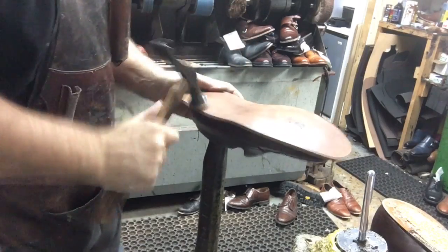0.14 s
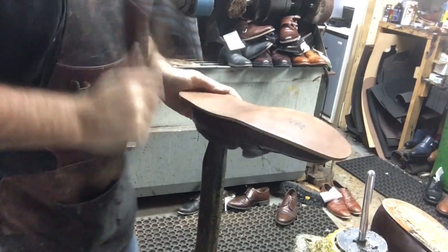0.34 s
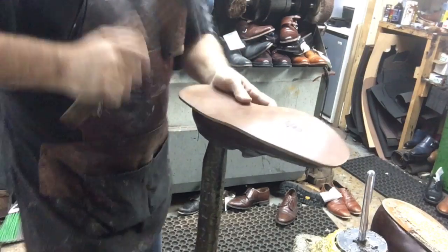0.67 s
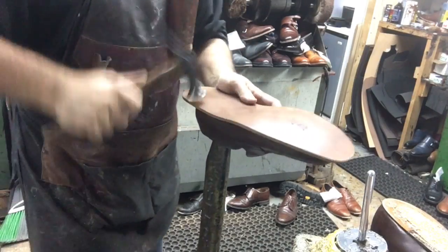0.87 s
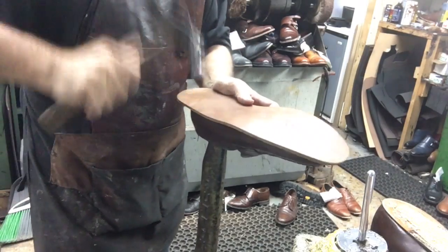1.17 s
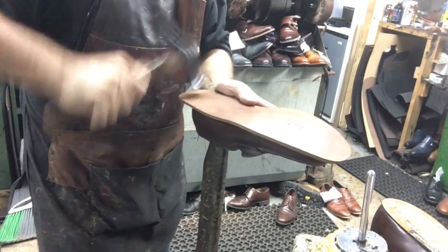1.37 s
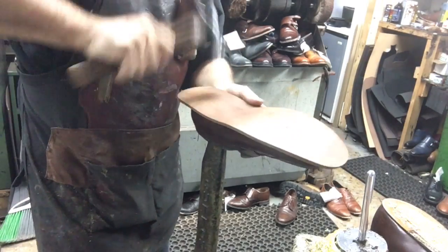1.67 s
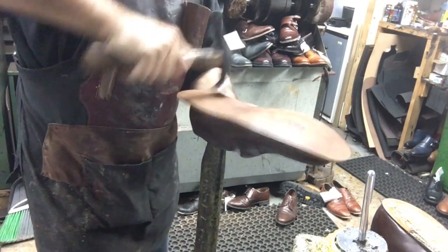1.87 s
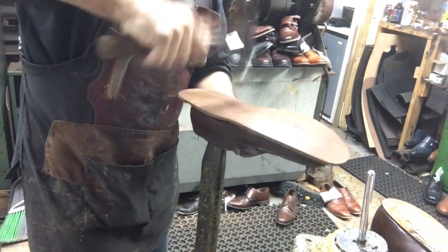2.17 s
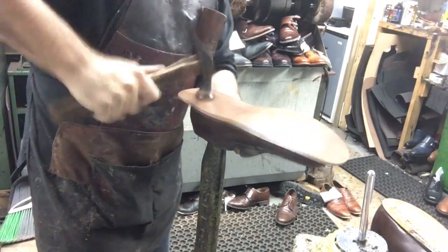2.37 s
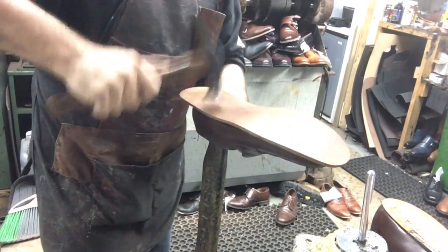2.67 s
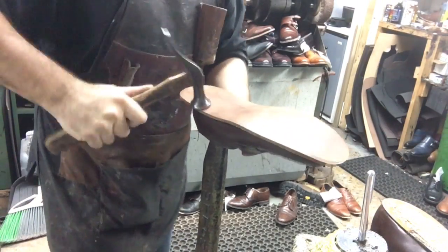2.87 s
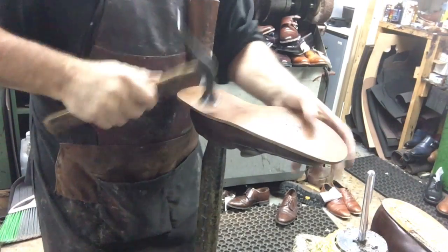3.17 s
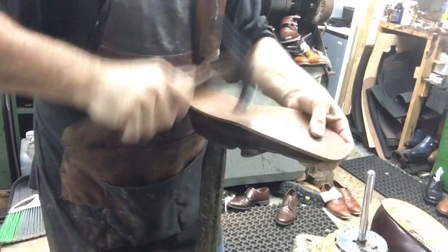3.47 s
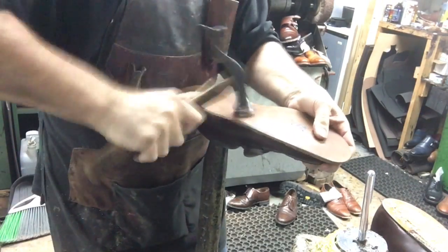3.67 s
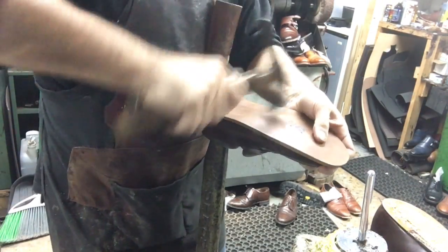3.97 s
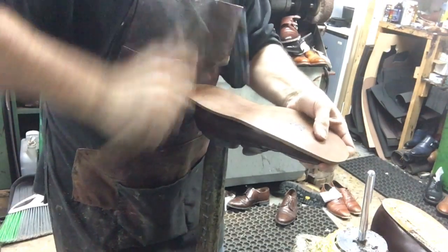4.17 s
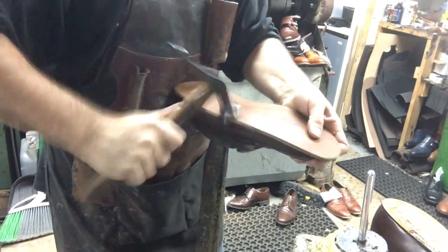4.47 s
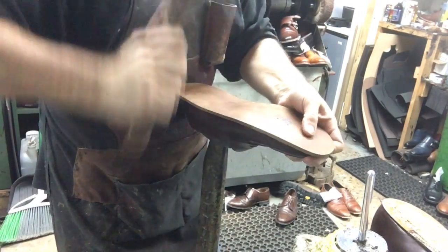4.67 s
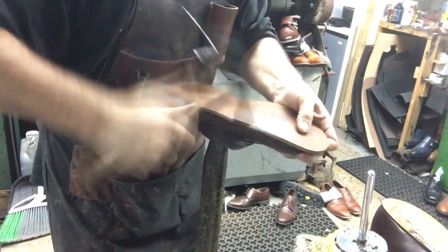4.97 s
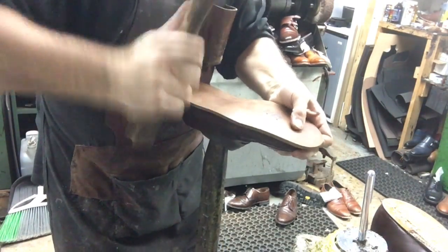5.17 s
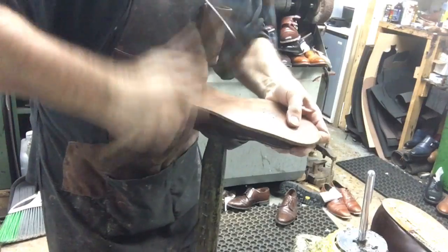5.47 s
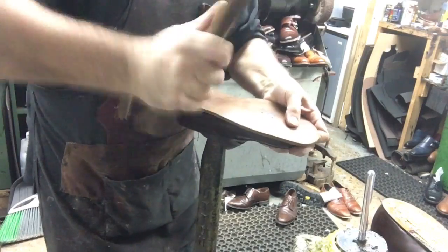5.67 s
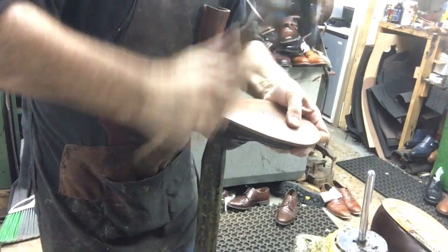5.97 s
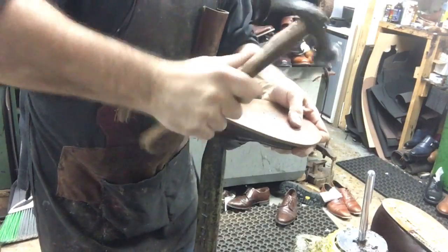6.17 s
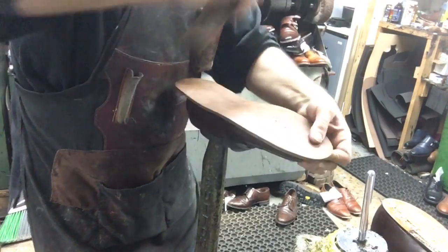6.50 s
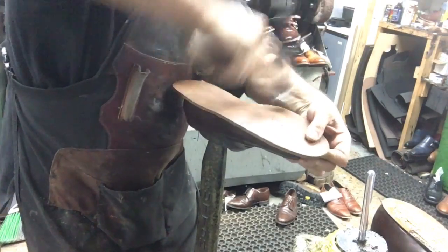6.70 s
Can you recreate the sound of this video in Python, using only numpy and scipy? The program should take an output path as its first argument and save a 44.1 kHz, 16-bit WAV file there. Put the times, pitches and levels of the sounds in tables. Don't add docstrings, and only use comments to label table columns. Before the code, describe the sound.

Rapid, even hammer blows slap leather over iron, each with a sharp crack, brief metallic ring and low floor thump, close up in a small shop.

```python
import sys
import numpy as np
from scipy import signal
from scipy.io import wavfile
from scipy.ndimage import uniform_filter1d

SR = 44100
rng = np.random.default_rng(int(sys.argv[2]) if len(sys.argv) > 2 else 0)


def pcm_store(signal):
    levels = np.round(np.clip(np.atleast_2d(signal), -1, 1) * 32767)
    wavfile.write(sys.argv[1], SR, levels.astype(np.int16).T)


def boost_factor(decibels):
    exponent = np.asarray(decibels, float) / 20
    return 10 ** exponent


N = 301581
LEAD = 4410

CENTRES = 30 * 2 ** np.arange(0, 9.2, 1 / 3)
USUAL_CRACK_DB = -8
HEEL_FROM_S = 3.2


def at_hz(table, hz):
    rows = np.array(table)
    return [np.interp(np.log(hz), np.log(rows[:, 0]), column) for column in rows.T[1:]]


def band_pass(x, low_hz, high_hz, order=2):
    return signal.sosfilt(signal.butter(order, [low_hz, high_hz], "band", fs=SR, output="sos"), x)


def band(x, hz):
    return band_pass(x, hz / 1.12, hz * 1.12)


def ring(hits, hz, t60_s):
    r = boost_factor(-60 / (t60_s * SR))
    w = 2 * np.pi * hz / SR
    return signal.lfilter([0, np.sin(w)], [1, -2 * r * np.cos(w), r * r], hits + 1e-18)


def clicks(seconds, gains):
    out = np.zeros(N + LEAD)
    at = np.round(np.asarray(seconds) * SR).astype(int) + LEAD
    inside = at < len(out)
    np.add.at(out, at[inside], np.asarray(gains)[inside])
    return out


def swell(hits, rise_s, t60_s):
    up, down = np.exp(-1 / (max(rise_s, 1e-5) * SR)), boost_factor(-60 / (t60_s * SR))
    dying = signal.lfilter([1], [1, -down], hits + 1e-18)
    return signal.lfilter([1 - up], [1, -up], dying)


COLOUR_HZ = [
    500,
    1100,
    2000,
    3800,
    10000,
]
# start_s [s], extra_edge_db [dB]
GLANCING = [
    (2.14, 9),
    (6.71, 11),
]
CRACK_BAND_DB = -8
SLAP_DB, SLAP_FOLLOWS = -18, 0.32
EDGE_DB, EDGE_FOLLOWS, EDGE_RINGS = -30.5, 0.058, 0.23


def blow_db(blows, hz):
    start_s, crack_db, body_db, knock_db, freedom_db = blows.T
    swing_db = crack_db - USUAL_CRACK_DB
    bite_db = sum(db * (abs(start_s - s) < .1) for s, db in GLANCING)
    colours = [crack_db + body_db,
               crack_db + knock_db,
               SLAP_DB + SLAP_FOLLOWS * swing_db,
               crack_db + CRACK_BAND_DB,
               EDGE_DB + EDGE_FOLLOWS * swing_db + EDGE_RINGS * freedom_db + bite_db]
    return np.array([np.interp(np.log(hz), np.log(COLOUR_HZ), row) for row in np.transpose(colours)])


# pitch_hz [Hz], density_db [dB per Hz]
HUM = [(30, -14), (55, -3), (80, -3.5), (105, 0), (135, -1), (190, -19), (300, -13), (1000, -20),
       (2500, -26.5), (5000, -31), (8000, -38), (16000, -42.5)]
HUM_DB = -61.5


def hum():
    white = rng.standard_normal((2, N + LEAD))
    noise = sum(boost_factor(at_hz(HUM, hz)[0]) * band(white[k % 2], hz) for k, hz in enumerate(CENTRES))
    return boost_factor(HUM_DB) * noise / np.std(noise)


# start_s [s], length_s [s], level_db [dB], centre_hz [Hz]
RUSTLES = [
    (.45, 0.15, -80, 11000),
    (0.636, .25, -78, 3500),
    (2.992, .5, -83, 3950),
    (6.446, 0.41, -87, 3900),
]
RUSTLE_RISE_S, RUSTLE_FALL_S, RUSTLE_REST_DB = 0.04, 0.08, -87.5


def rustle():
    t, out = (np.arange(N + LEAD) - LEAD) / SR, 0
    white = rng.standard_normal((2, N + LEAD))
    shapes = []
    for start_s, length_s, *_ in RUSTLES:
        corners_s = np.cumsum([0, RUSTLE_RISE_S, max(length_s - RUSTLE_RISE_S, 0), RUSTLE_FALL_S])
        shapes.append(np.interp(t - start_s, corners_s, [0, 1, 1, 0]))
    level_db, centre_hz = np.transpose(RUSTLES)[2:]
    for k, hz in enumerate(CENTRES[15:]):
        rest = boost_factor(RUSTLE_REST_DB - 6.5 * np.log2(hz / 4000) ** 2)
        moving = boost_factor(level_db - 7.6 * np.log2(hz / centre_hz) ** 2) @ np.array(shapes)
        out = out + (rest + moving) * band(white[k % 2], hz) * np.sqrt(SR / hz)
    return out


# pitch_hz [Hz], t60_s [s], slap_share_db [dB]
ROOM = [
    (200, 0.23, -3),
    (714, 0.17, -6.5),
    (2010, 0.15, -2),
    (5100, 0.13, -7.5),
    (8850, 0.16, -1),
    (13700, 0.016, -12.5),
]


def shop_echo(x, blows, count):
    t = np.arange(SR // 3) / SR
    white = rng.standard_normal((2, count, len(t)))
    tails = sum(band(white[k % 2], hz) * boost_factor(-60 * t / at_hz(ROOM, hz)[0])
                for k, hz in enumerate(CENTRES[7:]))
    tails *= 1 - np.exp(-t / 0.017)
    path = np.searchsorted(blows[:, 0] * SR + LEAD, np.arange(len(x))) % count
    out = 0
    for k, tail in enumerate(tails):
        even_tail = tail / np.sqrt(np.sum(tail ** 2))
        out = out + signal.fftconvolve(x * (path == k), even_tail)[:len(x)]
    return out


def rumble(blows):
    low = band_pass(rng.standard_normal(N + LEAD), 45, 135, order=4)
    shaken = swell(clicks(blows[:, 0], np.ones(len(blows))), rise_s=.03, t60_s=1.2)
    return boost_factor(HUM_DB + 13) * shaken * low / np.std(low)


# centre_hz [Hz], width_hz [Hz], level_db [dB]
FORERUNS = [
    (650, 130, -8.5),
    (1060, 380, 2.5),
    (3000, 84, 3.5),
    (4700, 770, -5.5),
    (5960, 460, -12),
    (8200, 65, -26),
]
FORERUN_LOW_DB, FORERUN_HIGH_DB, FORERUN_FOLLOWS, FORERUN_RINGS = -34, -44, 1.0, 0.79
FORERUN_LEAD_S, FORERUN_BROAD_DB, FORERUN_BROAD_S = .021, -21, .023


def foreruns(blows):
    out = np.zeros(N + LEAD)
    low = FORERUN_LOW_DB + FORERUN_FOLLOWS * (blow_db(blows, 1100) + 18) + FORERUN_RINGS * blows[:, 4]
    high = FORERUN_HIGH_DB + FORERUN_FOLLOWS * (blow_db(blows, 3000) + 16) + FORERUN_RINGS * blows[:, 4]
    t = np.arange(-2000, 0) / SR
    shape = np.clip(1 + t / FORERUN_LEAD_S, 0, 1) ** 3.0
    for start_s, low_db, high_db in zip(blows[:, 0], low, high):
        white = rng.standard_normal(2000)
        end = round(start_s * SR) + LEAD
        broad = band_pass(white, 700, 5000)
        out[end - 2000:end] += boost_factor(high_db + FORERUN_BROAD_DB) * (t > -FORERUN_BROAD_S) * broad / np.std(broad)
        for hz, width_hz, db in FORERUNS:
            narrow = band_pass(white, hz - width_hz / 2, hz + width_hz / 2)
            gain = boost_factor(db - 4 + (low_db if hz < 2000 else high_db))
            out[end - 2000:end] += gain * shape * narrow / np.std(narrow)
    return out


# start_s [s], peak_db [dB], centre_hz [Hz]
TOUCHES = [(0.663, -53, 3000), (0.674, -61, 4000), (2.364, -55.5, 915), (2.394, -40, 1490),
           (3.051, -42.5, 2420), (3.194, -56.5, 3000), (3.702, -49.5, 1810), (3.949, -48.5, 1840),
           (4.25, -56.5, 2500), (5.55, -63, 3000), (6.5753, -50, 3000), (6.688, -61, 4070)]


def touches():
    out, t = np.zeros(N + LEAD), np.arange(600) / SR
    for start_s, peak_db, hz in TOUCHES:
        tick = band_pass(rng.standard_normal(600), hz / 2, hz * 2)
        at = round(start_s * SR) + LEAD
        out[at:at + 600] += boost_factor(peak_db + 4.0) * tick * np.exp(-t / 0.0036)
    return out


# pitch_hz [Hz], t60_s [s], blow_share [gain], rock_share [gain]
BOARDS = [
    (58.2, .41, -1.48, .95),
    (65.7, .7, 1.7, -1.2),
    (84, .07, 1.45, 4.45),
    (100, .05, -1.77, -6.43),
    (108.7, .8, .15, .12),
    (151.5, .04, -.71, .55),
]
PUSHES = [
    .0022,
    .033,
]
TOE_WEIGHT_DB, HEEL_WEIGHT_DB, WEIGHT_FOLLOWS = -32.5, -29, 0.11


def floor_thump(blows):
    weight_db = np.where(blows[:, 0] < HEEL_FROM_S, TOE_WEIGHT_DB, HEEL_WEIGHT_DB)
    weight_db = weight_db + WEIGHT_FOLLOWS * (blows[:, 1] - USUAL_CRACK_DB)
    uneven_db = 1.2 * rng.standard_normal((len(blows), len(PUSHES)))
    blow, back = [clicks(blows[:, 0] + later_s, boost_factor(weight_db + uneven_db[:, k]))
                  for k, later_s in enumerate(PUSHES)]
    boards = sum(ring(first * blow + second * back, hz, t60_s) for hz, t60_s, first, second in BOARDS)
    return signal.sosfiltfilt(signal.butter(4, 190, fs=SR, output="sos"), boards)


IRON_HZ = [355, 600, 650, 990, 1165, 1212, 2090, 2125, 2175, 3100, 3150, 3200, 3765, 3980, 5450, 5630, 6190]
# level_db [dB], t60_s [s]
IRON = [(-28, .13), (-29, .09), (-30, .1), (-28, .1), (-27, .13), (-25, .12), (-35, .13), (-43, .22),
        (-34, .11), (-32, .12), (-31, .14), (-34, .19), (-35, .11), (-36, .1), (-41, .13), (-49, .2),
        (-44, .11)]
# pitch_hz [Hz], toe_db [dB], heel_db [dB]
RING_COLOUR = [(355, -8.5, -10), (620, -6.5, -6.5), (1110, -10, -3), (2210, -7.5, -4), (2980, -16, -10.5),
               (5500, -15, -4)]


def iron(blows, level_db, spread_db, flutter_db):
    chance = rng.standard_normal((len(blows), len(IRON)))
    out, t = 0, np.arange(N + LEAD)
    for k, (hz, (db, t60_s)) in enumerate(zip(IRON_HZ, IRON)):
        toe_db, heel_db = at_hz(RING_COLOUR, hz)
        struck_db = np.where(blows[:, 0] < HEEL_FROM_S, toe_db, heel_db) + blows[:, 4]
        hits = clicks(blows[:, 0] + .002, boost_factor(level_db + db + struck_db + spread_db * chance[:, k]))
        knots = len(t) // 300 + 2
        waver = np.interp(t / 300, np.arange(knots), rng.standard_normal(knots))
        out = out + ring(hits, hz, min(t60_s, .24)) * boost_factor(flutter_db * waver)
    return out


# pitch_hz [Hz], width_hz [Hz], added_db [dB]
BODY = [(1185, 110, 0), (2150, 160, 0), (3230, 170, 1), (4300, 220, -2), (5500, 220, 0), (6300, 240, 0),
        (7250, 240, 2), (8700, 260, 0)]


def body(x):
    out = x
    for hz, width_hz, db in BODY:
        r = np.exp(-np.pi * width_hz / SR)
        poles = [1, -2 * r * np.cos(2 * np.pi * hz / SR), r * r]
        out = out + boost_factor(db) * signal.lfilter([(1 - r * r) / 2, 0, (r * r - 1) / 2], poles, x)
    return out


# pitch_hz [Hz], level_db [dB], rise_s [s], t60_s [s]
SLAP = [(177.1, -16, 0.0087, 0.11), (248, -23, 0.0018, 0.06), (341, -3.5, 0.0062, 0.14),
        (470, -9.5, 0.0018, 0.12), (616, 11, 0.0026, 0.029), (714, -0.5, 0.0081, 0.059),
        (1112, -1, 0.00029, 0.091), (2260, 2, 0.00053, 0.032), (3012, 0, 0.0077, 0.026),
        (3660, 1, 0.0023, 0.029), (6410, 0.5, 0.00014, 0.019), (8000, -12, 0.00012, 0.0067),
        (11900, -10, 0.00014, 0.005), (16000, -16, .0002, .012)]
TAIL_RINGS = .4


def slap(blows, level_db, spread_db, grain_db, tail_db):
    grain = boost_factor(grain_db * rng.standard_normal((N + LEAD) // 30 + 1)).repeat(30)[:N + LEAD]
    grain /= np.sqrt(np.mean(grain ** 2))
    white = rng.standard_normal((4, N + LEAD))
    chance = rng.standard_normal((len(blows), len(CENTRES)))
    out = 0
    for k, hz in enumerate(CENTRES[8:]):
        db, rise_s, t60_s = at_hz(SLAP, hz)
        struck = boost_factor(level_db + db + blow_db(blows, hz) + spread_db * chance[:, k])
        burst = swell(clicks(blows[:, 0], struck), rise_s, t60_s) * band(white[k % 2] * grain, hz)
        room_t60_s, room_db = at_hz(ROOM, hz)
        sent = clicks(blows[:, 0], struck * boost_factor(TAIL_RINGS * blows[:, 4]))
        tail = boost_factor(tail_db + room_db) * swell(sent, 0.0083, room_t60_s) * band(white[2 + k % 2], hz)
        out = out + (burst + tail) * np.sqrt(SR / hz)
    return out


# later_s [s], level_db [dB]
BOUNCES = [
    (0, 0),
    (.0016, -2),
    (.0038, -2),
    (.008, -7),
]


def crack(blows, level_db, low_hz, high_hz):
    out, chance = 0, rng.uniform(-1, 1, (len(blows), len(BOUNCES), 2))
    for k, (later_s, db) in enumerate(BOUNCES):
        when = blows[:, 0] + later_s * (1 + 0.5 * chance[:, k, 0])
        tick_db = level_db + db + 3.0 * chance[:, k, 1] + blow_db(blows, 6900)
        out = out + clicks(when, (-1) ** (k + 1) * boost_factor(tick_db))
    return band_pass(out, low_hz, high_hz)


# start_s [s], crack_db [dB], body_db [dB], knock_db [dB], freedom_db [dB]
BLOWS = [(0.204, -15.5, -9.5, 0.5, -1), (0.4517, -12.5, -5, -9, -10.5), (0.8822, -5.5, -11.5, -12, -0.5),
         (1.1325, -6, -11.5, -10.5, -2), (1.385, -8.5, -6, -10, -6.5), (1.6275, -10.5, -9, -10, 0),
         (1.8752, -16, -5.5, -8, -4.5), (2.1397, -15, -5, -5, -17), (2.4204, -7, -18.5, -3, 3),
         (2.666, -7, -12.5, -3.5, 1.5), (2.908, -7, -7.5, -8, -2.5), (3.4595, -7.5, -12.5, -11.5, -1),
         (3.724, -4, -19.5, -11, 1.5), (3.9708, -8, -11, -8, -2.5), (4.271, -5, -22.5, -12.5, 0),
         (4.5305, -9, -12.5, -12.5, -2), (4.7973, -8, -16.5, -10, 0), (5.0532, -6.5, -15.5, -10, -6),
         (5.3111, -4.5, -19, -14, -3), (5.575, -2.5, -14.5, -15.5, -3.5), (5.8252, -8, -13.5, -11, -1),
         (6.0833, -1.5, -17.5, -17, -1), (6.3216, -10, -8.5, -10.5, -1.5),
         (6.7138, -12.5, -6.5, -11.5, -10.5)]
# start_s [s], crack_db, body_db, knock_db, freedom_db [dB]
EARLIER_BLOW = [
    (-0.06, -6, -14.5, -7.5, -7),
]


def scene():
    blows = np.array(EARLIER_BLOW + list(BLOWS))
    leather = slap(blows, level_db=1.0, spread_db=2.16, grain_db=3.0, tail_db=-10.0)
    near = iron(blows, level_db=9.0, spread_db=2.0, flutter_db=5.0)
    near += body(leather) + touches()
    near += crack(blows, level_db=16.0, low_hz=2600, high_hz=13000)
    far = boost_factor(-15.0) * shop_echo(near, blows, count=2) + hum() + rustle() + rumble(blows)
    far = signal.sosfilt(signal.cheby2(10, 40, 16200, fs=SR, output="sos"), far)
    return (near + far + floor_thump(blows) + foreruns(blows[1:]))[None, LEAD:]


def band_limit(x):
    return signal.sosfilt(signal.butter(12, 16990, fs=SR, output="sos"), x)


def record(dry):
    dry = signal.sosfilt(signal.butter(2, 40, "high", fs=SR, output="sos"), dry)
    level_db = 10 * np.log10(uniform_filter1d(dry ** 2, size=90) + 1e-12)
    fall_db = 60.0 * np.arange(N) / SR
    held_db = np.maximum.accumulate(level_db + fall_db, axis=1) - fall_db
    duck_db = signal.lfilter([.02], [1, -.98], -.25 * np.maximum(held_db + 26, 0))
    x = boost_factor(duck_db + 5.0) * dry
    rounded = .8 * np.tanh(x / .8)
    mix = signal.sosfilt(signal.cheby2(10, 50, 16900, fs=SR, output="sos"), rounded)
    return band_limit(mix)


dry = scene()
out = record(dry)
pcm_store(out)
```